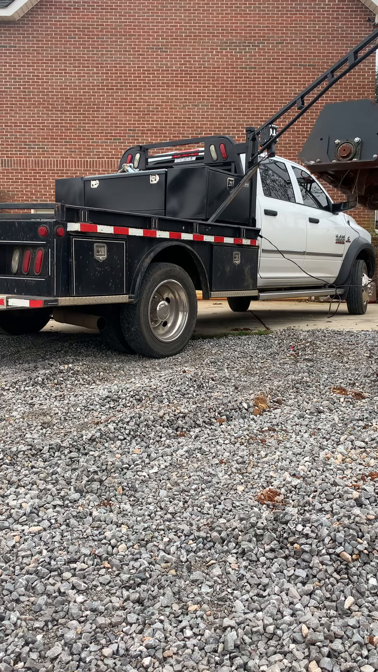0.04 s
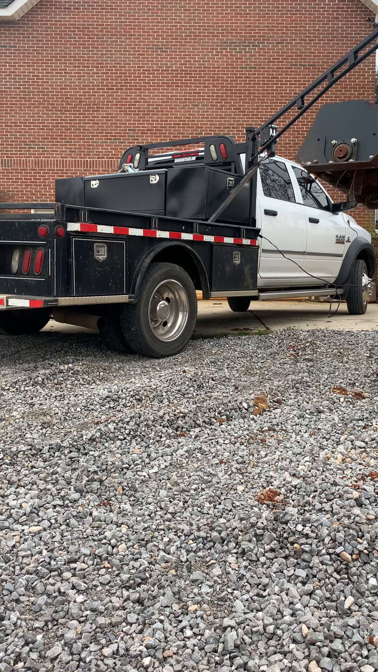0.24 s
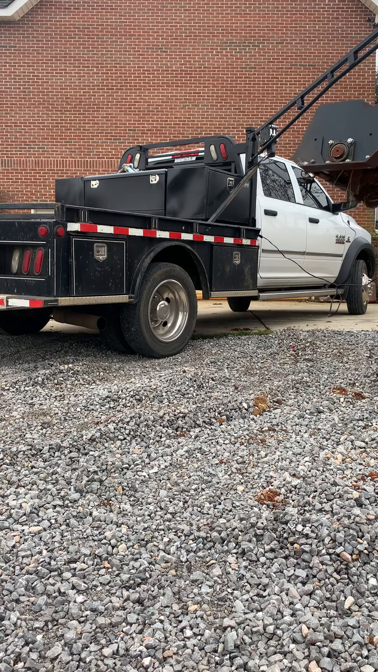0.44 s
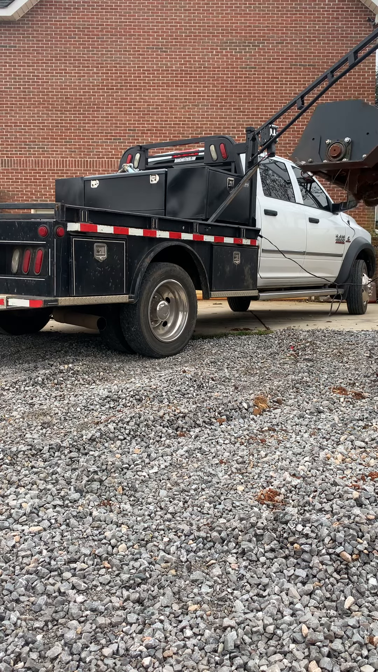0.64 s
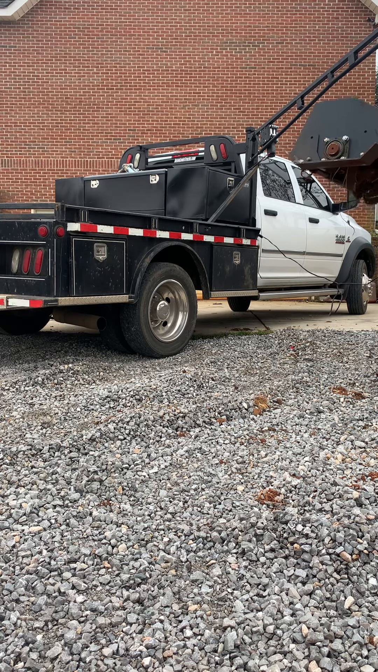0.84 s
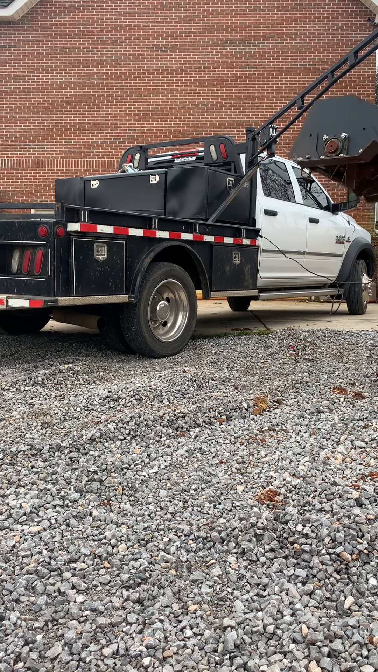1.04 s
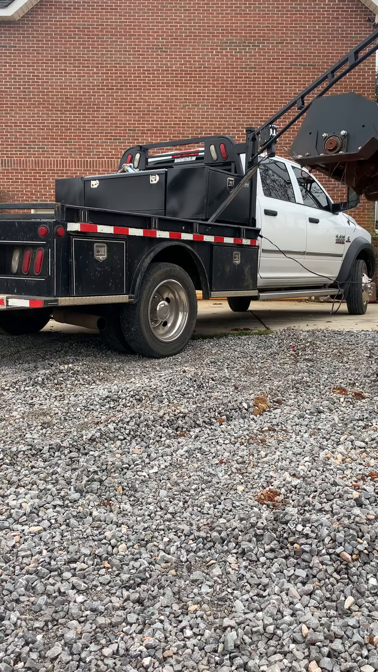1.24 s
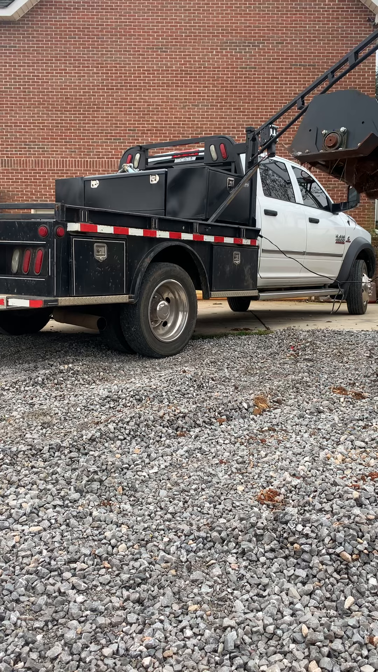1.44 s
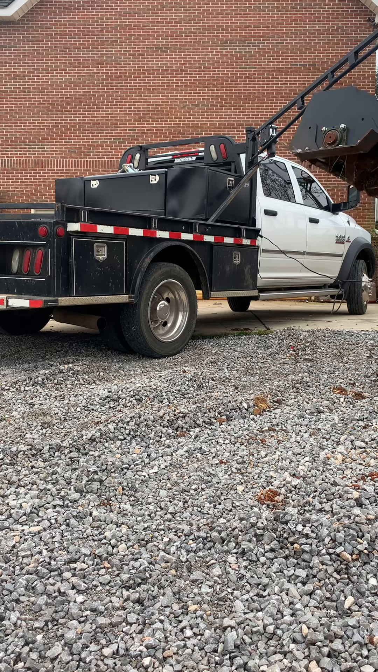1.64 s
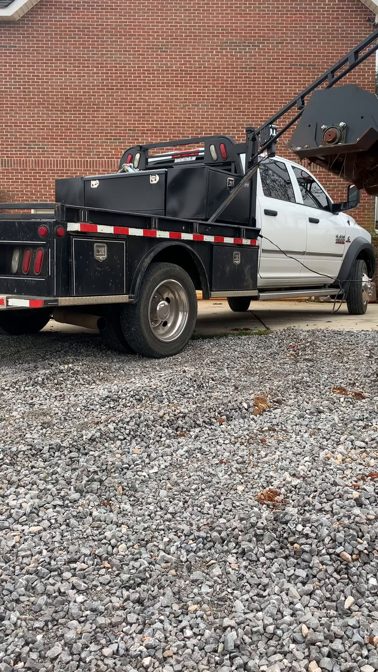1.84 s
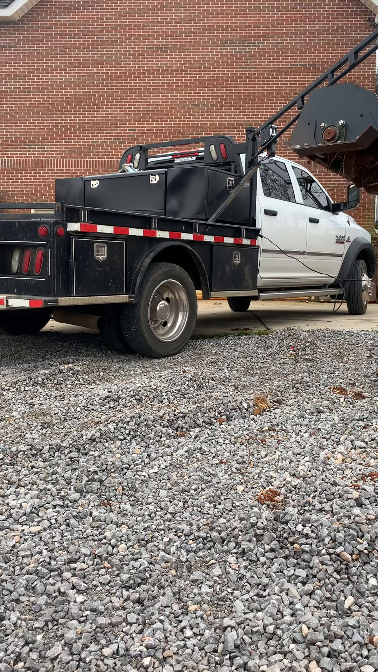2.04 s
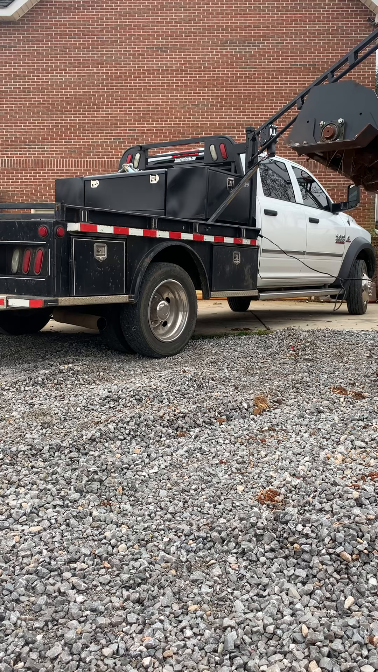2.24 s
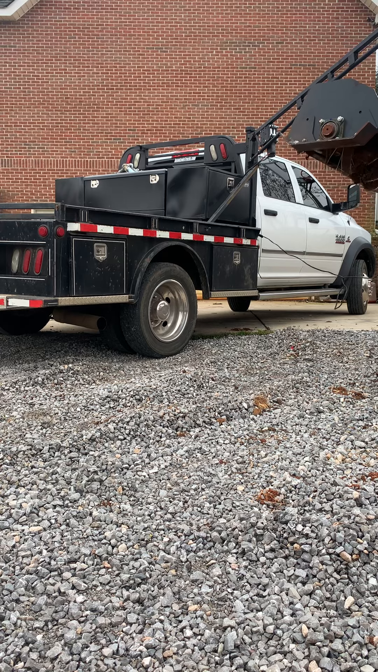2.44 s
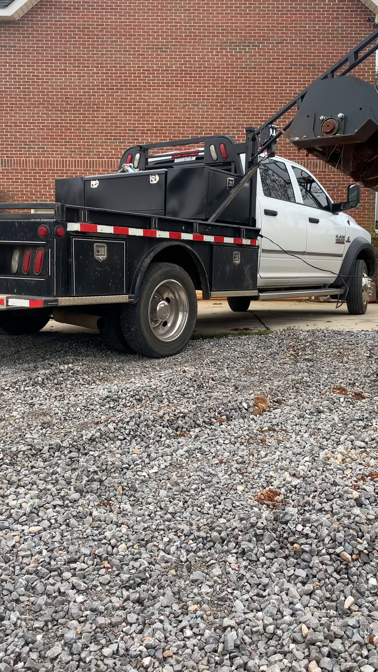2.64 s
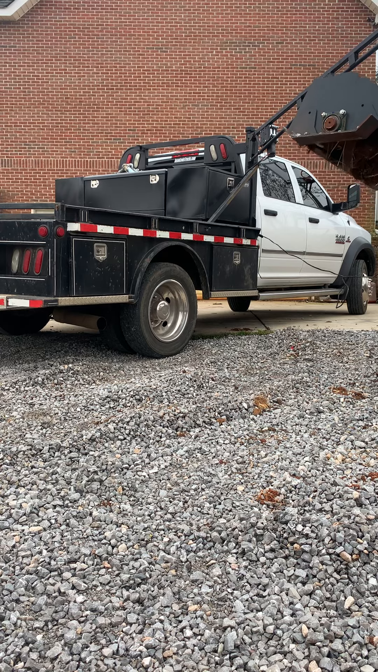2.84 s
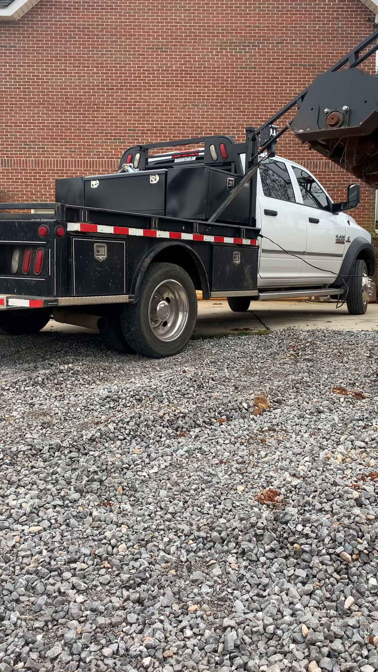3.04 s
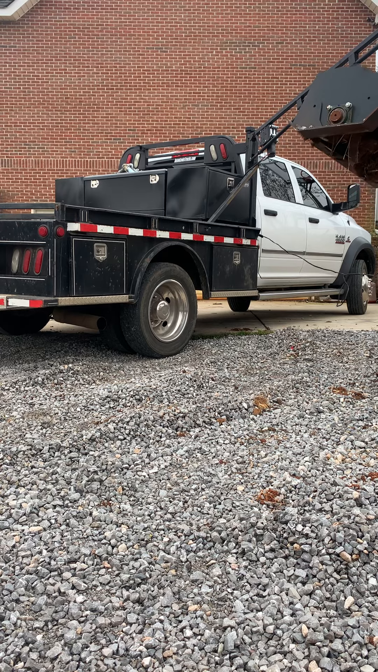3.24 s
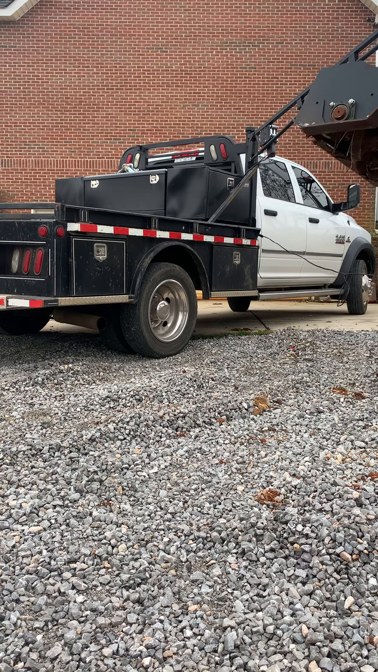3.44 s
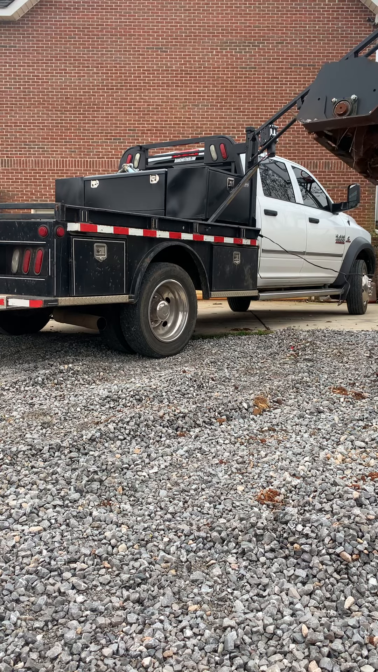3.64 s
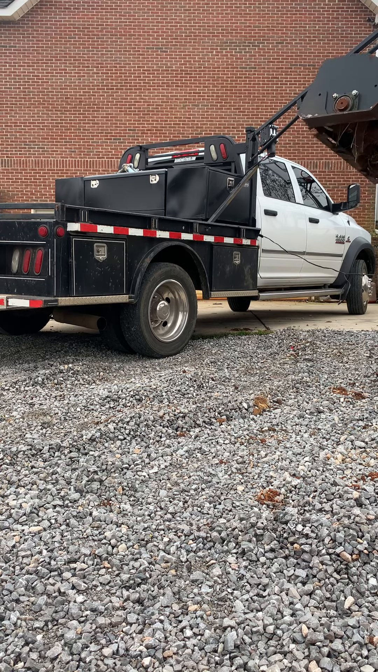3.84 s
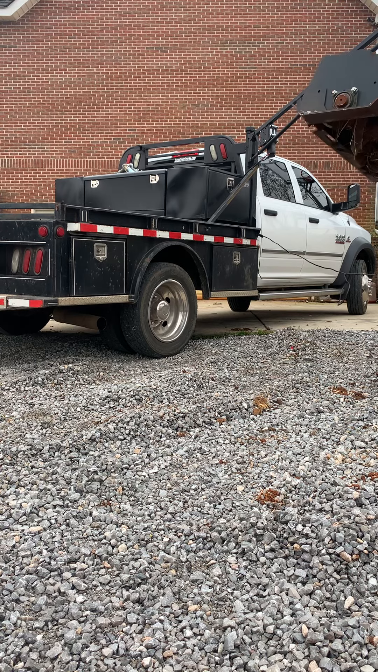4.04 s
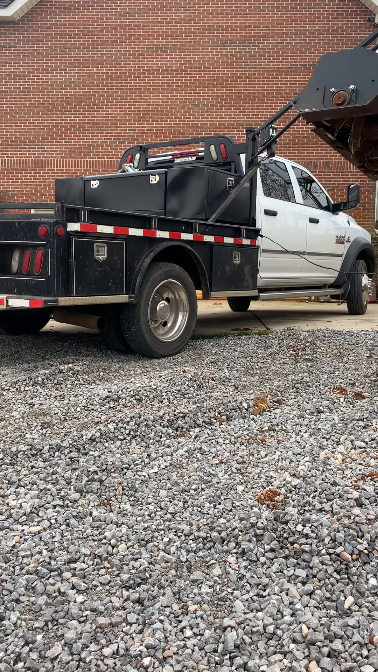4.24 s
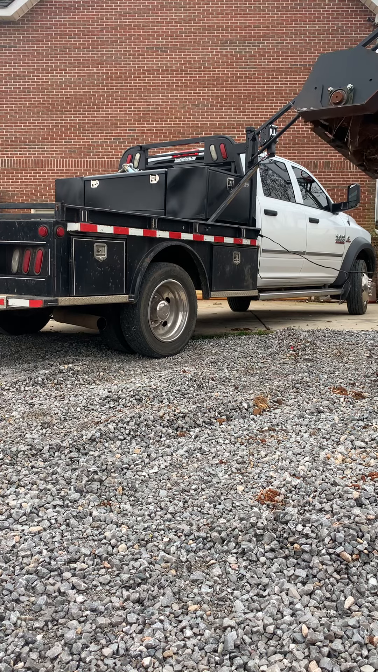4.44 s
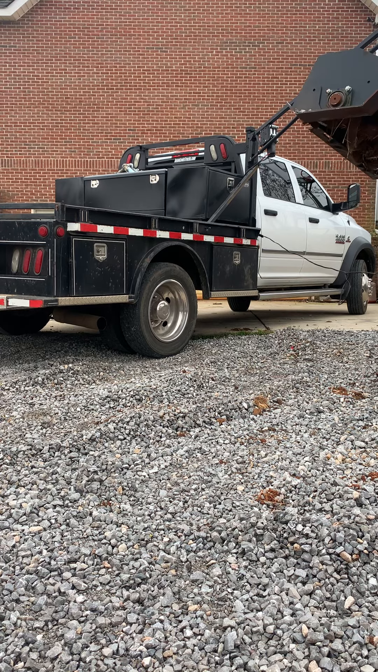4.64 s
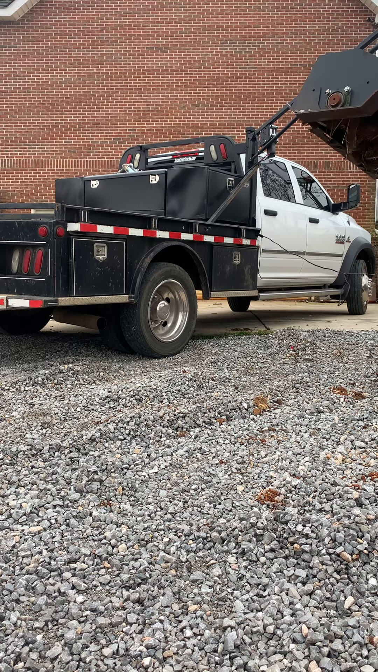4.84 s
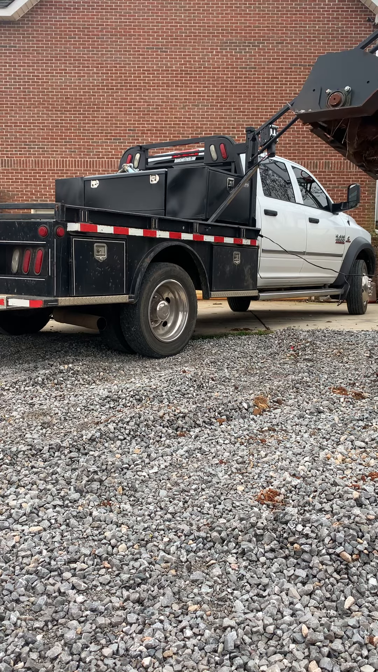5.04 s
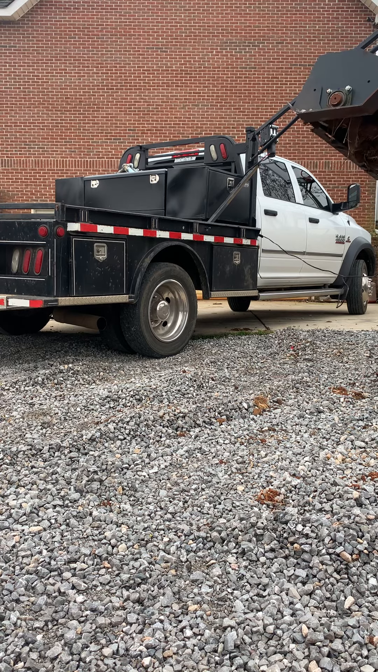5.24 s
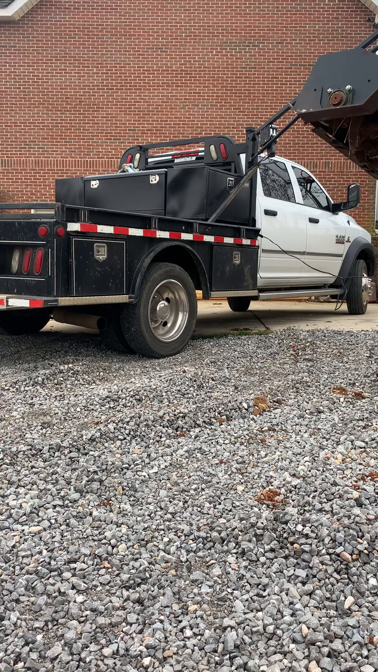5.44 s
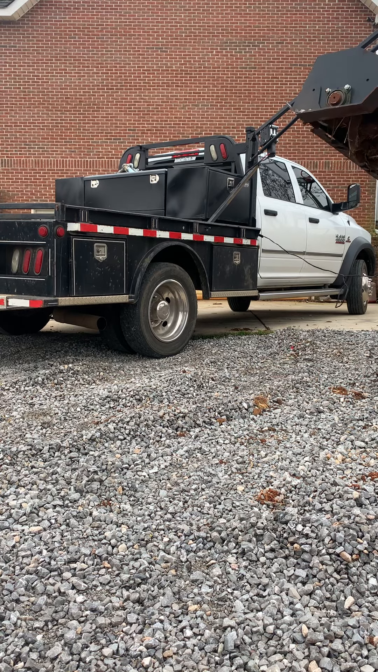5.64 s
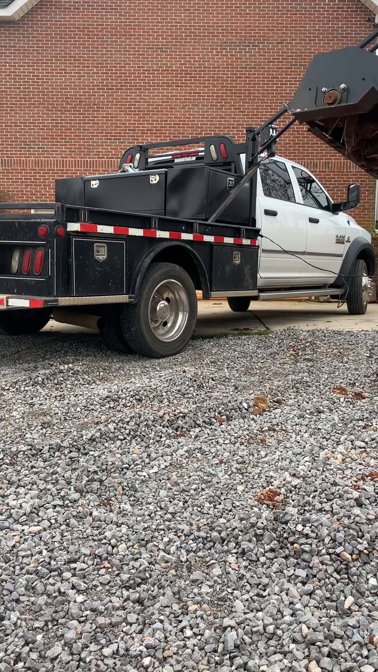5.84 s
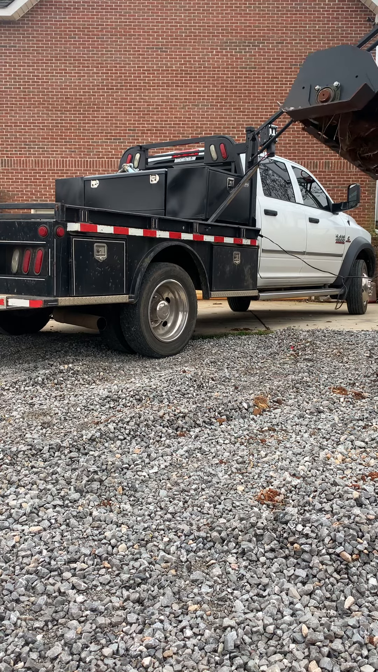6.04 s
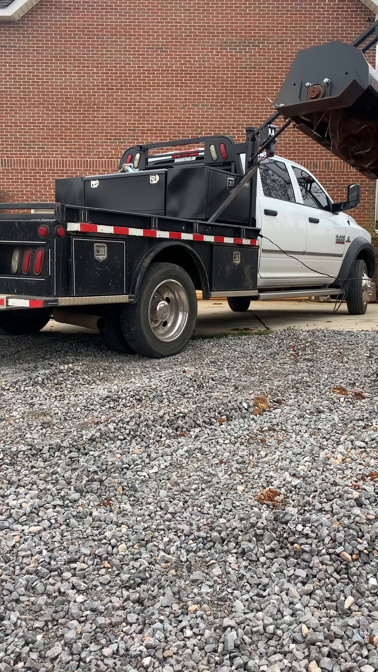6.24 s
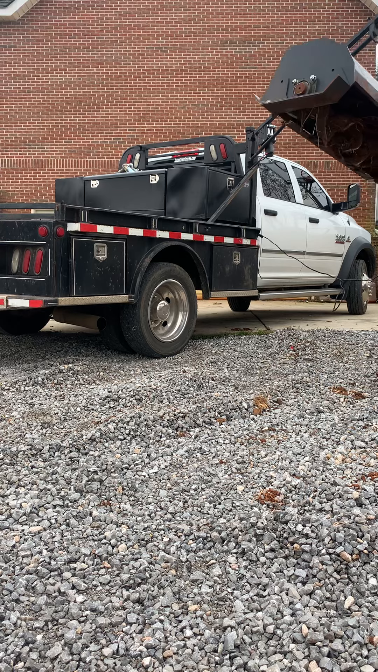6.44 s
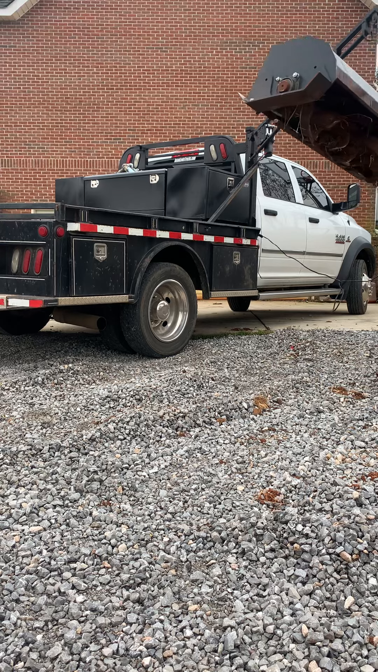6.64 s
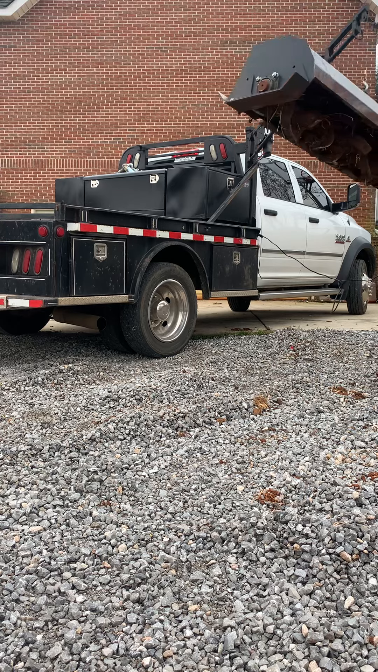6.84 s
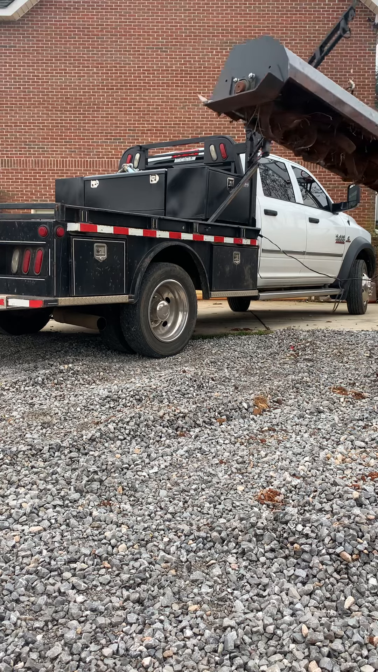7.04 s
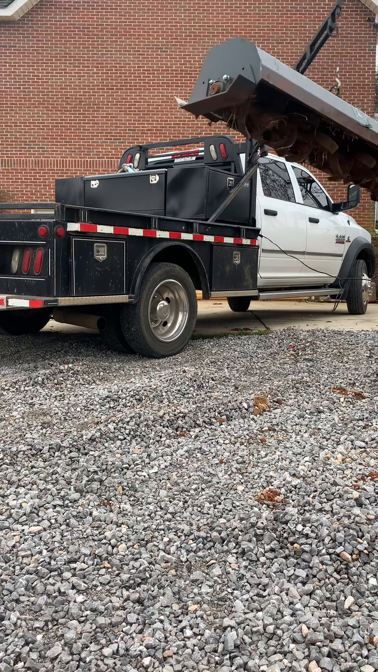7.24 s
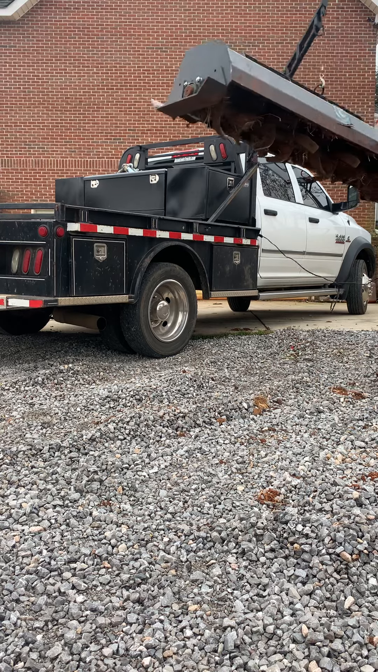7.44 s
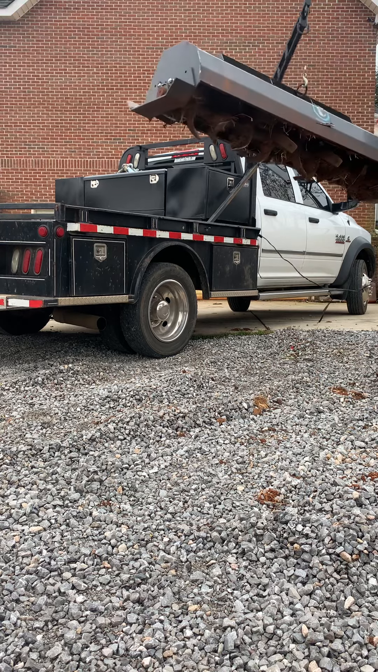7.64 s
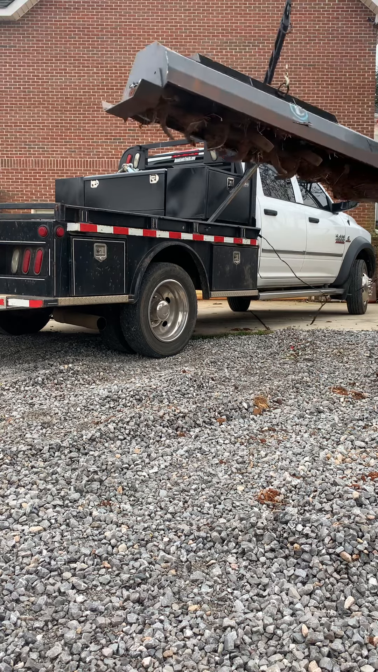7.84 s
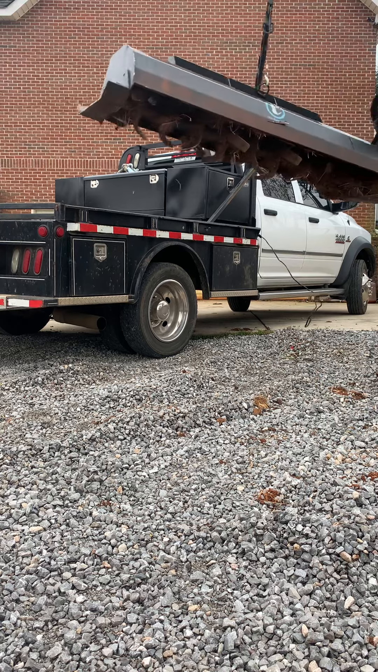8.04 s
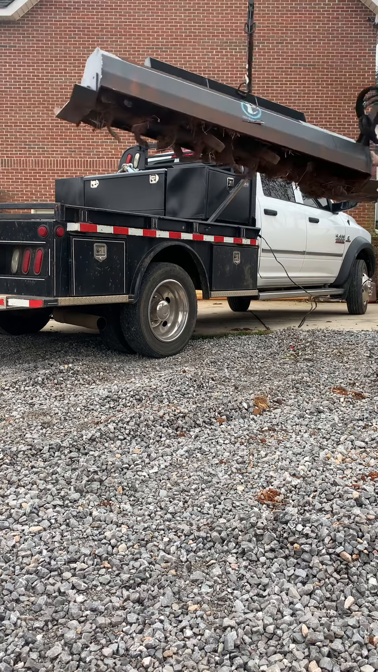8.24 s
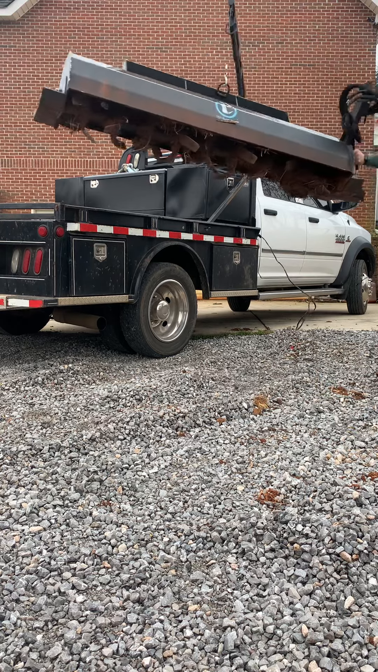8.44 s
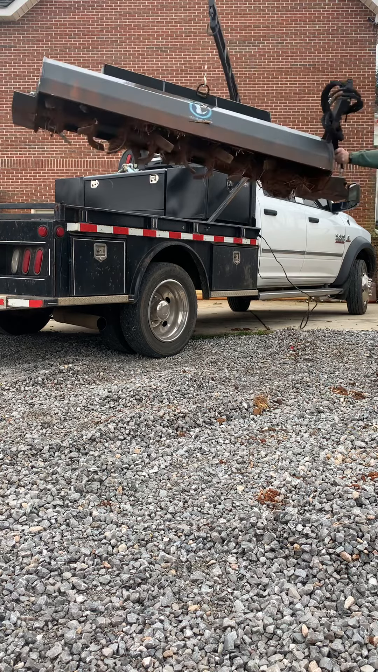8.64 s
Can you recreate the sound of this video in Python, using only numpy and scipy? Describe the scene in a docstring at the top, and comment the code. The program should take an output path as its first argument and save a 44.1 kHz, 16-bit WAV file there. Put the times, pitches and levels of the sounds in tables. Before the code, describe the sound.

From 0 to 4.4 s a truck crane's motor dominates: a loud low hum around 250 Hz, beating and wavering unevenly, with rough gear rattle, resonant steel buzz and thin hiss pulsing slightly every 0.6 s. Bright cable ticks appear around 0.5-1 s, 2.5-3.2 s and just before the stop. At 1.1 s one heavy clank crashes, with short ringing steel and a low shudder. At 4.4 s the motor cuts abruptly; boom and bed ring hollowly for under a second, with a very faint knock at 4.7 s. The quiet yard emerges: distant engine drone, soft air, far chattering birds. A near bird's quick chips sink in pitch from 4.5 to 6.5 s; clear whistles sound around 6.6 and 7.1 s, a rapid trill at 7.6-8 s. Tiny stone clicks lead to gravel crunches, snaps and dull knocks from 7 s, the strongest thud near 7.9 s, continuing to the end. Close stereo pickup, slight brick-wall echo.

```python
"""A throbbing motor hum with gear rattle opens the scene: a truck's crane lifts a load beside a brick wall.
The hum is a sum of beating shaft orders; the rattle is noise and a repeating tooth pattern through resonances.
One loud clank of decaying steel modes sounds in the lift; the motor stops abruptly and the structure rings out.
A distant engine (a wavering sine) and far birds lie under it all and are then exposed.
Nearer birds sing in gliding sines, and gravel crunches underfoot in bursts of filtered noise."""
import sys
import numpy as np
from scipy import signal
from scipy.fft import rfft, irfft, next_fast_len
from scipy.io import wavfile
from scipy.ndimage import map_coordinates

SR = 44100
rng = np.random.default_rng(int(sys.argv[2]) if len(sys.argv) > 2 else 0)


def generate_wav(sig):
    """Save sig (samples, or channels by samples) to the path in sys.argv[1] as 16-bit PCM at SR."""
    pcm = np.round(np.clip(np.atleast_2d(sig).T, -1, 1) * 32767).astype(np.int16)
    wavfile.write(sys.argv[1], SR, pcm)


N = 384111
STOP_S = 4.41  # the motor stops

# spectrum of a sharp metallic contact: (frequency [Hz], density [dB per Hz])
TICK_COLOUR = [(500, -26), (1500, -23), (3500, -1), (6000, 2.5), (8500, 3), (11000, -3.5), (13000, -5.5),
               (15800, -2)]


def amp(db):
    """The decibel law: level to amplitude gain."""
    return 10 ** (np.asarray(db) / 20)


def unit(x):
    """Normalisation of signal power: scaled to rms 1."""
    return x / np.sqrt(np.mean(x ** 2) + 1e-20)


def clock(seconds):
    """Uniform sampling: the sample times of a stretch."""
    return np.arange(int(seconds * SR)) / SR


def along(points, hz):
    """Interpolation of (frequency [Hz], value) points on a logarithmic frequency axis."""
    f, v = np.transpose(points)
    return np.interp(np.log(hz + 1), np.log(f + 1), v)


def curves(rows):
    """Linear interpolation in time: one value per sample for each column after the time."""
    s, *cols = np.transpose(rows)
    return [np.interp(np.arange(N) / SR, s, c) for c in cols]


def wobble(rate):
    """Band-limited random fluctuation: a smooth curve through rate random knots a second."""
    knots = rng.standard_normal(int(N * rate / SR) + 4)
    return map_coordinates(knots, [np.arange(N) * rate / SR])


def filtered(x, response):
    """Linear filtering: the spectrum of x times a complex response of frequency."""
    n = x.shape[-1]
    m = next_fast_len(n + SR // 4)
    return irfft(rfft(x, m) * response(np.fft.rfftfreq(m, 1 / SR)), m)[..., :n]


def coloured(x, spectrum):
    """Spectral shaping: x weighted by a spectrum, at rms 1."""
    return unit(filtered(x, lambda hz: amp(along(spectrum, hz))))


def noise(apart, size=N):
    """Interchannel coherence: stereo noise with a shared part and, above the bass, a part of each side's own."""
    own = filtered(rng.standard_normal((2, size)), lambda hz: hz / np.hypot(hz, 300))
    return unit(rng.standard_normal(size) + apart * own)


def add(track, s, sound):
    """Superposition: mixes a sound into a track at time s."""
    part = track[..., max(round(s * SR), 0):][..., :sound.shape[-1]]
    part += sound[..., :part.shape[-1]]


def run_down(t60):
    """Exponential decay: full strength until the motor stops, then 60 dB lost in each t60."""
    return amp(-60 * np.maximum(np.arange(N) / SR - STOP_S, 0) / t60)


def wall(x):
    """Diffuse reverberation: the yard's echo as decaying noise whose treble dies sooner than its bass."""
    # decay of the echo: (frequency [Hz], t60 [s])
    decay = [(150, .5), (1000, 0.12), (4000, 0.34), (12000, 0.031)]
    hz, t, z = signal.stft(rng.standard_normal((2, SR // 2)), SR, nperseg=256)
    fading = z * amp(-60 * t / along(decay, hz)[:, None])
    tail = signal.istft(fading, SR, nperseg=256)[1]
    return signal.fftconvolve(np.atleast_2d(x), tail / np.linalg.norm(tail[0]), axes=1)[:, :N]


def hum(turns, lower_db, centre_db, upper_db):
    """Beating: neighbouring shaft orders interfere, so the hum throbs unevenly about once a turn."""
    # weaker tones of the motor: (shaft order, relative level [dB])
    overtones = [(6, -48.5), (7, -50.5), (10, -49.5), (14, -44), (18, -38), (19, -49), (20, -38), (21, -37),
                 (26, -48), (31, -52.5), (32, -44.5), (41, -47), (42, -48), (47, -47.5), (48, -41),
                 (66, -47)]

    def tone(order, db, drift):
        return np.sqrt(2) * amp(db) * np.sin(2 * np.pi * order * turns + drift)

    centre = tone(16, centre_db + .9 * wobble(35), .15 * wobble(10))
    lower = tone(15, lower_db + 2 * wobble(14), 1.2 * wobble(6))
    upper = tone(17, upper_db + 2 * wobble(14), 1.1 * wobble(7))
    weak = 0
    for order, db in overtones:
        drift = 2 * np.pi * rng.random() + order / 22 * wobble(22)
        weak = weak + tone(order, db + 3.37 * wobble(7), drift)
    tones = amp(.6) * centre + amp(-1) * (lower + upper)
    return (tones + amp(-2.5) * weak) * run_down(t60=.27)


def panels(x):
    """Modal density: countless small steel panels ripple the spectrum, fully so above 1200 Hz."""
    spacing_hz, depth_db = 22, 2.2
    ripple = rng.standard_normal(int(SR / spacing_hz))

    def response(hz):
        depth = depth_db * np.clip((hz - 300) / 900, 0, 1)
        return amp(depth * map_coordinates(ripple, [hz / spacing_hz], order=1))

    return unit(filtered(x, response))


def gears(turns):
    """Forced vibration: teeth that meet alike every turn, and random chatter, shake the boom and truck bed."""
    # level of the gear train: (time [s], relative level [dB])
    rattle_level = [(0, -38), (1.2, -39.5), (2.4, -40), (3.8, -38.5), (4.41, -38.5)]
    # resonances of boom and truck bed: (frequency [Hz], width [Hz], relative level [dB])
    resonances = [(328, 26, 0), (426, 8.6, 5), (513, 11, 4), (674.5, 61, -3), (759.3, 46, 0.5),
                  (816, 16, 12.5), (917, 8, -3), (1053.4, 22, 10), (1339.5, 41, -1), (1580, 18, 5),
                  (1820, 3.3, 4), (2120, 11, -3.5), (2596, 10, -11.5), (3370, 17, -10.5)]
    # spectra of the rattle, the shuddering truck bed and the hiss: (frequency [Hz], density [dB per Hz])
    rattle_colour = [(40, -34.5), (70, -15.5), (100, -4), (200, -5.5), (400, -2.5), (800, 2.5),
                     (1300, -6.5), (2200, -5), (3000, -12), (4500, -17), (9000, -65)]
    bed_colour = [(70, -30.5), (130, -11), (180, -5.5), (260, 3.5), (480, -9), (800, -18), (2000, -38),
                  (5000, -61.5)]
    hiss_colour = [(1500, -26), (3000, -13), (5000, 3), (7000, 4.5), (8500, 1), (10500, -2), (13000, -15.5),
                   (15800, -13.5)]
    # the gears run tighter once in each turn of the winch drum
    drum_turn_s, tight_at_s = 0.6096, 0.23
    rattle_swing_db, hiss_swing_db, mean_hiss_db = 1, 1.9, -41.5

    tight = np.cos(2 * np.pi * (np.arange(N) / SR - tight_at_s) / drum_turn_s)
    rattle_db = curves(rattle_level)[0] + rattle_swing_db * tight
    hiss_db = mean_hiss_db + hiss_swing_db * tight
    teeth = rng.standard_normal(2700)  # roughness round one shaft turn
    repeating = map_coordinates(teeth, [turns % 1 * len(teeth)], mode="grid-wrap")
    once_a_turn = np.sin(2 * np.pi * turns)
    surge = amp(1.2 * once_a_turn + 1.2 * wobble(220))
    drive = (0.51 * repeating + noise(apart=0.92)) * surge

    def boom(f):
        # second-order resonances in parallel, with alternating sign
        return sum((-1) ** k * amp(db) * 1j * f * w / (c * c - f * f + 1j * f * w)
                   for k, (c, w, db) in enumerate(resonances))

    rattle = amp(8.5) * panels(coloured(drive, rattle_colour)) + amp(6.5) * unit(filtered(drive, boom))
    bed = amp(1.5) * coloured(noise(apart=0.53), bed_colour) * run_down(t60=1.0)
    hiss_gain = amp(hiss_db + 0.47 * once_a_turn + 1.6 * wobble(60))
    hiss = hiss_gain * coloured(noise(apart=0.34), hiss_colour)
    return amp(rattle_db) * (rattle * run_down(t60=0.31) + bed) + hiss * run_down(t60=0.235)


def clicks(rows, colour, t60, tail_db, tail_t60):
    """Impulsive excitation: a hard contact gives a bright crack and a weaker, longer sizzle."""
    out, t = np.zeros((2, N)), clock(0.26)
    for s, db in rows:
        decay = amp(-60 * t / t60) + amp(tail_db - 60 * t / tail_t60)
        add(out, s, amp(db) * decay * coloured(noise(apart=0.23, size=len(t)), colour))
    return out


def cable_ticks():
    """Impulsive excitation: sharp ticks of the cable."""
    # ticks: (time [s], relative level [dB])
    tick_times = [(0.0433, -25.5), (0.5087, -24), (0.53, -24), (0.7198, -27), (0.8874, -25.5),
                  (0.9223, -26.5), (0.9946, -29.5), (2.4648, -28), (2.5905, -29.5), (2.83, -27),
                  (3.047, -23), (3.1936, -29), (4.346, -33.5), (4.3784, -25), (4.4024, -22)]
    return amp(-4.5) * clicks(tick_times, TICK_COLOUR, t60=.025, tail_db=-8, tail_t60=.12)


def yard():
    """Frequency modulation: a distant engine's tone wavers over the outdoor air and an uneven faint rustle."""
    # spectra of the outdoor air and the rustle: (frequency [Hz], density [dB per Hz])
    air_colour = [(20, -30), (35, -9), (55, 7.5), (100, 3), (170, -1.5), (230, -7), (350, -23), (600, -28),
                  (1300, -34.5), (2300, -28), (4000, -27.5), (6000, -48), (10000, -57), (15800, -60)]
    rustle_colour = [(3000, -25), (5000, -1), (7500, -1), (11000, -8), (15800, -10.5)]
    phase = 2 * np.pi * np.cumsum(56 + .35 * wobble(3.8)) / SR
    drone = amp(-49.5 + 1.2 * wobble(7.6)) * np.sin(phase)
    rustle = amp(-80 + 3 * wobble(23)) * coloured(noise(apart=0.33), rustle_colour)
    air = amp(-51.5 + 1.2 * wobble(8.3)) * coloured(noise(apart=0.83), air_colour)
    return drone + rustle + air


def note(length, start_hz, end_hz, rasp_hz, bend=2):
    """Frequency modulation: a bird's note glides on a power curve while rasp makes its pitch tremble."""
    t = clock(length)
    u = t / length
    tremble = map_coordinates(rng.standard_normal(int(length * 500) + 4), [t * 500])
    hz = end_hz + (start_hz - end_hz) * (1 - u) ** bend + rasp_hz * tremble
    return np.sin(2 * np.pi * np.cumsum(hz) / SR) * np.sqrt(np.abs(np.sin(np.pi * u)))


def flock():
    """Random superposition: many far birds chatter in short, overlapping notes."""
    faintest_db, rasp_hz = -73, 60
    out = np.zeros(N)
    for when, length, pitch, slide, size in rng.random((520, 5)):
        start_hz = 1850 * 2.1 ** pitch
        end_hz = start_hz * (.8 + .36 * slide)
        chirp = note(.018 + .035 * length, start_hz, end_hz, rasp_hz)
        add(out, when * N / SR, amp(faintest_db + 8 * size ** 2) * chirp)
    return out


def clank():
    """Modal decay: the load drops on its rigging in a crash, ringing steel and a low shudder of the truck."""
    # the load settles, hard during the lift and faintly after it: (time [s], relative level [dB])
    blows = [(1.097, -9), (4.675, -53.5)]
    # modes of the struck steel: (frequency [Hz], relative level [dB], t60 [s])
    modes = [(112.4, -18.5, .45), (140.6, -20, .45), (256.8, -9, 0.45), (330.4, -10.5, 0.56),
             (416.5, -16, 0.33), (485, -6.5, .35), (620, -12.5, .2), (667, -3, 0.43), (715, -5.5, .2),
             (749, 0, 0.25), (867, -5, 0.15), (1057, -4.5, 0.2), (1140, -5, 0.15), (1560, -12.5, .25)]
    # spectrum of the crash: (frequency [Hz], density [dB per Hz])
    crash_colour = [(50, -29), (120, -9.5), (300, -6.5), (500, 0), (780, 4.5), (1500, -4), (2500, -11.5),
                    (4500, -25), (8000, -25.5), (15800, -33.5)]
    shudder_colour = [(55, -27.0), (85, -1.5), (125, 2.5), (155, 4.0), (220, -42.5)]
    out, t = np.zeros((2, N)), clock(0.3)

    def chatter():
        # random walk of a mode's phase, in cycles
        return .005 * np.cumsum(rng.standard_normal(len(t))) + rng.random()

    for s, db in blows:
        ring = sum(amp(level - 60 * t / t60) * np.sin(2 * np.pi * (hz * t + chatter()))
                   for hz, level, t60 in modes)
        crash_gain = amp(-60 * t / .22 + 1.5 * wobble(130)[:len(t)])
        crash = coloured(noise(apart=0.99, size=len(t)), crash_colour) * crash_gain
        crack = coloured(noise(apart=0.18, size=len(t)), TICK_COLOUR) * amp(-12.5 - 60 * t / .04)
        swell = np.exp(-((t - .085) / 0.11) ** 2)
        shudder = amp(-23) * swell * coloured(rng.standard_normal(len(t)), shudder_colour)
        onset = 1 - np.exp(-t / .005)
        add(out, s, amp(db) * ((.6 * ring + .85 * crash) * onset + crack + shudder))
    return out


def ring_out():
    """Free vibration: released by the stop, boom and bed ring on unevenly at their own pitches."""
    # ringing modes: (frequency [Hz], mean level before decay [dB], t60 [s])
    modes = [(161, -40, 1.7), (257.5, -25.5, 0.97), (292, -31, 0.79), (334, -33, .6), (500, -30.5, 0.46),
             (723, -46, 0.55), (835, -37, .4), (910, -49, 0.47), (1680, -55, 0.74), (2094, -69, .5)]
    t = np.arange(N) / SR
    released = np.clip((t - STOP_S) / .04, 0, 1)
    ringing = 0
    for hz, db, t60 in modes:
        gain = amp(db + 2 * wobble(30)) * run_down(t60)
        ringing = ringing + gain * np.sin(2 * np.pi * hz * t + .5 * wobble(20))
    return released * ringing


def chips():
    """Frequency modulation: notes arch, then relax exponentially in pitch and fade; the song sinks."""
    # notes: (time the drop begins [s], top [Hz], hold [s], level of the hold [dB], level of the drop [dB])
    song = [(4.495, 5640, .035, -47, -57), (4.645, 5730, .04, -51, -55), (4.789, 5620, .045, -46.5, -56),
            (4.931, 5560, .04, -53, -56.5), (5.082, 5630, .04, -52, -55.5), (5.225, 5520, .04, -51, -58.5),
            (5.339, 5060, .025, -51, -56.5), (5.49, 5000, .02, -58.5, -60), (5.659, 4770, .018, -59, -54),
            (5.88, 4600, .018, -58, -60.5), (6.109, 4380, .015, -56, -60), (6.225, 4240, .028, -52.5, -63),
            (6.338, 4220, .028, -51, -66), (6.45, 4210, .028, -53, -64), (6.528, 4200, .015, -75, -71)]
    end_hz, drop_s, arch_height_hz = 3280, .02, 160  # the drop's limit and time constant; the arch
    full_s, fade_db_per_s, rasp_hz = .02, 470, 42  # the drop fades after full_s; pitch unsteadiness
    out = np.zeros(N)
    for s, top_hz, hold, hold_db, drop_db in song:
        t = clock(hold + .07) - hold  # zero where the drop begins
        held, after = np.clip(1 + t / hold, 0, 1), np.maximum(t, 0)
        arch_hz = top_hz - arch_height_hz * (1.7 * held - 1) ** 2
        tremble = rasp_hz * map_coordinates(rng.standard_normal(70), [(t + hold) * 500])
        hz = end_hz + (arch_hz - end_hz) * np.exp(-after / drop_s) + tremble
        db = np.interp(t, [-hold * .2, full_s / 2], [hold_db, drop_db])
        db = db - fade_db_per_s * np.maximum(t - full_s, 0)
        swell = np.minimum(2 * held, 1)
        add(out, s - hold, amp(db) * swell * np.sin(2 * np.pi * np.cumsum(hz) / SR))
    return out


def gravel():
    """Granular friction: stones grind in tiny bursts under a shoe while the ground gives dully."""
    # single stones that snap: (time [s], relative level [dB])
    snaps = [(4.752, -60.5), (4.82, -58), (4.935, -56), (5.323, -56), (5.4869, -52), (5.5533, -51.5),
             (5.8, -58.5), (5.9245, -55), (5.9609, -44), (6.0062, -50.5), (6.272, -55), (6.478, -60),
             (7.1013, -29), (7.1912, -31), (7.274, -23.5), (7.3692, -29.5), (7.5073, -32.5), (7.6937, -33),
             (7.7937, -40), (7.9374, -34.5), (8.161, -41.5), (8.2142, -38.5), (8.316, -37.5)]
    # a shoe shifting: (start [s], length [s], crunch relative level [dB], tread relative level [dB])
    scuffs = [(6.283, 0.058, -55, -57), (6.748, 0.22, -72, -57), (7.023, 0.064, -49.5, -59.5),
              (7.175, 0.15, -47.5, -62.5), (7.493, 0.016, -44.5, -44), (7.552, 0.141, -58.5, -50),
              (7.722, 0.11, -57.5, -51.5), (7.845, 0.068, -49, -54), (8.012, 0.062, -49.5, -55.5),
              (8.204, 0.017, -57, -55), (8.304, .11, -53, -48.5), (8.532, .09, -62, -44.5),
              (8.645, 0.05, -47, -57)]
    # dull knocks underfoot: (time [s], relative level [dB], pitch [Hz], upper edge [Hz])
    knocks = [(7.101, -47, 418, 700), (7.232, -45, 340, 500), (7.273, -37, 612, 1600),
              (7.324, -48, 504, 1190), (7.502, -53, 378, 1100), (7.578, -41, 355, 600),
              (7.68, -44.5, 342, 600), (7.737, -46, 300, 500), (7.795, -32.5, 330, 890),
              (7.885, -49, 312, 550), (7.938, -25.5, 271, 700), (8.373, -36.5, 453, 700),
              (8.401, -31, 218, 450), (8.553, -52, 463, 1600), (8.589, -45, 404, 1490)]
    # spectra of snapping stones, crunch and dull tread: (frequency [Hz], density [dB per Hz])
    stone_colour = [(500, -30.5), (1500, -19), (3500, -9), (6000, 9.5), (8500, 6), (11000, 4), (15800, -7)]
    crunch_colour = [(500, -27), (1500, -8), (2500, -6), (4000, 7), (5000, 2.5), (7000, 7), (8500, 2),
                     (11000, 1.5), (13000, -7.5), (15800, -10)]
    tread_colour = [(60, -35), (150, 5), (250, 4), (420, 3), (700, -9.5), (1400, -15.5), (2200, -28),
                    (3500, -21), (6000, -39.5)]
    # between scuffs the slowly turning shoe keeps grinding
    grind_from_s, grind_crunch_db, grind_tread_db = 6.55, -68.5, -60.5
    scuff_attack_s, scuff_t60_s, knock_t60_s = 0.017, 0.2, .048

    turning = np.clip((np.arange(N) / SR - grind_from_s) / 0.091, 0, 1)
    crunching, treading = amp(grind_crunch_db) * turning, amp(grind_tread_db) * turning
    t = clock(1)
    for s, length, crunch_db, tread_db in scuffs:
        release = amp(-60 * np.maximum(t - length, 0) / scuff_t60_s)
        pressure = np.minimum(t / scuff_attack_s, 1) * release
        add(crunching, s, amp(crunch_db) * pressure)
        add(treading, s, amp(tread_db) * pressure)
    # about 450 random slips a second, each a short decaying burst
    slips = (rng.random(N) < 450 / SR) * amp(2.5 * np.minimum(rng.exponential(size=N), 4))
    grains = unit(signal.fftconvolve(slips, amp(-60 * clock(.02) / 0.014))[:N])
    clumps = amp(-2.5 + 2.4 * wobble(55))
    crunch = crunching * coloured(noise(apart=0.26) * (grains + .5), crunch_colour)
    tread = treading * coloured(noise(apart=0.95) * (grains + 1.3), tread_colour)
    out, t = clumps * (crunch + tread), clock(0.051)
    for s, db, hz, edge_hz in knocks:
        body_colour = [(hz / 3, -8), (hz, 0), (edge_hz, -4), (edge_hz * 1.7, -24), (edge_hz * 6, -45)]
        body = coloured(rng.standard_normal(len(t)), body_colour)
        thud = .55 * np.sin(2 * np.pi * hz * t) + .65 * body
        onset = 1 - np.exp(-t / 0.00083)
        add(out, s, amp(db - 60 * t / knock_t60_s) * onset * thud)
    return out + amp(-3.5) * clicks(snaps, stone_colour, t60=0.0092, tail_db=-14.5, tail_t60=0.18)


def whistles():
    """Frequency modulation: gliding whistles, made raspy by random pitch deviation."""
    # notes: (time [s], length [s], start [Hz], end [Hz], level [dB], rasp [Hz])
    calls = [(4.86, .09, 3450, 2900, -65, 220), (4.88, .06, 2280, 2170, -58, 20),
             (4.95, .05, 2100, 1750, -65, 40), (5.0, .14, 1720, 1700, -66, 15),
             (5.04, .1, 3300, 3270, -63, 25), (5.19, .06, 2550, 1950, -65, 70),
             (5.3, .03, 2000, 1750, -65, 30), (5.335, .035, 1750, 2200, -63, 30),
             (5.375, .035, 2200, 1700, -61, 30), (5.39, .07, 3600, 3500, -64, 70),
             (5.49, .1, 2800, 3100, -59, 300), (5.5, .05, 2500, 2150, -64, 90),
             (5.66, .04, 1900, 1750, -65, 70), (5.69, .12, 3320, 3300, -59, 15),
             (5.695, .03, 1950, 2200, -64, 25), (5.725, .055, 2250, 1700, -63, 35),
             (5.925, .035, 2400, 2280, -59, 30), (5.94, .09, 3350, 3280, -63, 50),
             (6.16, .06, 2350, 2000, -66, 90), (6.25, .07, 2250, 2400, -64, 150),
             (6.44, .06, 2600, 2850, -64, 140), (6.55, .05, 3000, 2250, -63, 120),
             (6.6, .065, 2850, 2770, -50.5, 15), (6.6, .15, 2560, 2540, -67, 40),
             (6.68, .07, 4150, 3300, -59, 120), (6.82, .14, 2400, 1980, -65, 60),
             (6.83, .08, 3900, 2650, -62, 90), (7.055, .045, 3800, 3650, -49, 200),
             (7.11, .3, 2850, 2812, -49, 14), (7.2, .07, 2400, 1950, -64, 45),
             (7.95, .07, 2150, 1750, -64, 40), (8.17, .085, 2100, 1780, -64, 25)]
    out = np.zeros(N)
    for s, length, start_hz, end_hz, db, rasp_hz in calls:
        add(out, s, amp(db) * note(length, start_hz, end_hz, rasp_hz))
    return out


def trill():
    """Periodic repetition: a three-note figure, ten times a second, fainter in its last two beats."""
    # beats: (time [s], level [dB])
    beats = [(7.589, -45), (7.689, -44.5), (7.787, -44), (7.886, -46), (7.986, -49)]
    # rising lead-in, main fall and soft upturn of each beat:
    # (time from the beat [s], length [s], start [Hz], end [Hz], level re the beat [dB], bend [exponent])
    figure = [(-.025, .032, 4950, 5350, -8, 1), (0, .03, 4550, 3650, 0, .7),
              (.042, .018, 3200, 3800, -11, 1)]
    out = np.zeros(N)
    for s, db in beats:
        for offset, length, start_hz, end_hz, note_db, bend in figure:
            sung = note(length, start_hz, end_hz, rasp_hz=30, bend=bend)
            add(out, s + offset, amp(db + note_db) * sung)
    return out


def placed(song, lead, wall_db):
    """Interchannel phase and reflection: a bird's direction, one soft brick-wall echo and the yard's tail."""
    echo = amp(-19) * np.roll(song, round(.043 * SR))
    heard = song + echo + amp(wall_db) * wall(song)[0]
    half = np.array([[.5], [-.5]])
    directed = filtered(heard, lambda hz: np.exp(1j * half * along(lead, hz)))
    return directed + amp(wall_db - 5.5) * wall(song)


def birds():
    """Directional superposition: the singer, the triller and the other birds, each with its phase lead."""
    # phase by which left leads, for singer, triller and others: (frequency [Hz], lead [rad])
    chip_lead = [(3500, 1), (4000, 1.5), (4250, 2.3), (4550, 5), (4800, 6.3)]
    trill_lead = [(3000, -.3), (5500, -.1)]
    whistle_lead = [(1700, -.6), (2200, -1.2), (2850, -1.5), (3300, .8), (3700, -.3)]
    singer = placed(chips(), chip_lead, wall_db=-8.5)
    triller = placed(trill(), trill_lead, wall_db=-13.5)
    others = placed(whistles() + flock(), whistle_lead, wall_db=-9)
    return singer + triller + others


def scene():
    """Superposition: the crane and its reflected blows, with birds, gravel and yard."""
    # motor under load, its hum shifting between three neighbouring tones: (time [s], shaft speed [turns/s],
    # order 15 relative level [dB], order 16 relative level [dB], order 17 relative level [dB])
    motor = [(0.0, 16.26, -37.5, -33.5, -35.0), (0.17, 16.34, -33.0, -24.0, -34.5),
             (0.45, 16.07, -35.0, -30.5, -31.5), (0.68, 16.2, -25.5, -27.0, -38.5),
             (0.9, 16.44, -31.0, -24.5, -38.0), (1.08, 16.19, -28.5, -28.5, -34.0),
             (1.24, 15.93, -36.0, -33.0, -29.0), (1.38, 15.95, -36.0, -19.0, -26.5),
             (1.62, 15.88, -35.0, -36.5, -36.0), (1.82, 15.83, -35.5, -23.5, -24.5),
             (2.04, 15.62, -36.0, -24.0, -19.5), (2.23, 16.01, -33.0, -33.5, -35.0),
             (2.42, 15.85, -27.0, -21.0, -33.5), (2.6, 15.8, -23.0, -20.5, -29.0),
             (2.74, 15.89, -24.5, -24.5, -32.5), (2.87, 16.15, -34.5, -33.5, -40.0),
             (3.05, 16.42, -39.5, -27.0, -35.5), (3.3, 16.26, -28.5, -24.0, -33.0),
             (3.52, 15.99, -38.5, -26.5, -30.5), (3.7, 16.14, -36.5, -27.5, -37.0),
             (3.9, 16.38, -29.0, -24.5, -37.0), (4.12, 16.25, -30.5, -26.5, -34.0),
             (4.41, 16.33, -29.5, -24.5, -34.5)]
    speed, *order_db = curves(motor)
    turns = np.cumsum(speed) / SR
    blows = clank() + cable_ticks()
    crane = hum(turns, *order_db) + gears(turns) + ring_out() + blows + amp(-10.0) * wall(blows)
    return crane + birds() + gravel() + yard()


def record(dry):
    """Interchannel difference: two microphone ports differ in phase and level, below a band limit."""
    # phase by which left leads: (frequency [Hz], lead [rad])
    port_lead = [(60, -.1), (300, -.35), (600, -.8), (800, -.3), (1400, -.1), (2000, .9), (2700, 2.8),
                 (3600, 3.6), (5000, 3.14), (5700, 3.3), (7700, 6.2), (9400, 6.4), (11700, 9.3),
                 (13600, 9.5), (15000, 12.4)]
    # left minus right: (frequency [Hz], level difference [dB])
    port_tilt = [(50, -2.5), (260, -2.5), (350, -3), (500, 0), (750, -3), (2200, -1), (3500, 0), (12000, 0)]
    top_hz = 15900
    half = np.array([[.5], [-.5]])

    def ports(hz):
        phase = np.exp(1j * half * along(port_lead, hz))
        return phase * amp(half * along(port_tilt, hz)) * (hz < top_hz)

    return filtered(dry, ports)


dry = scene()
out = record(dry)
generate_wav(out)
```